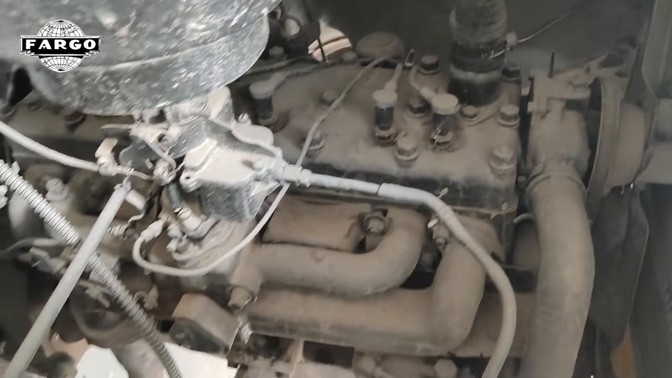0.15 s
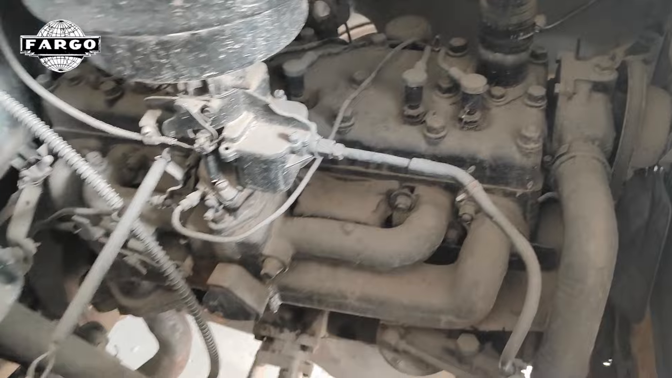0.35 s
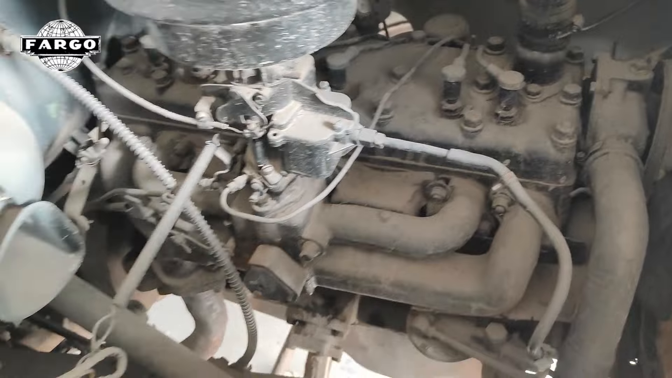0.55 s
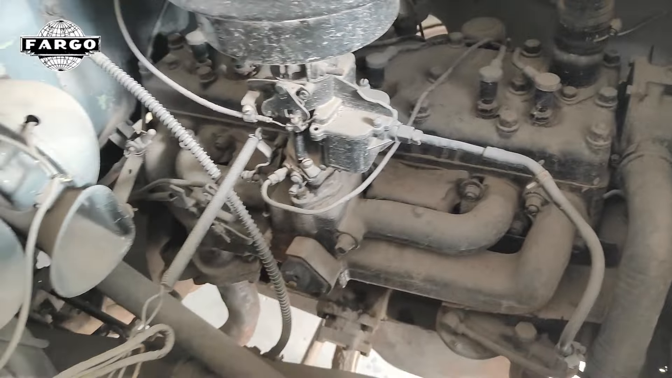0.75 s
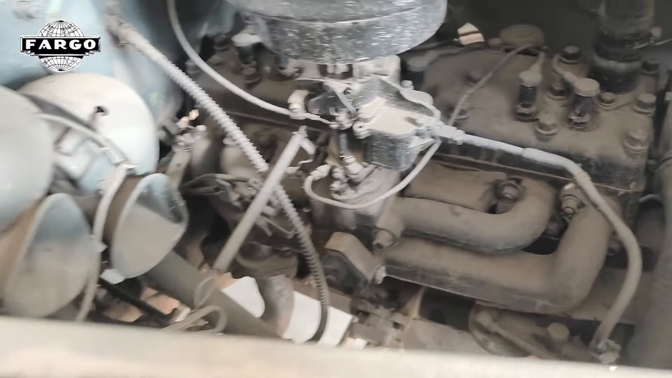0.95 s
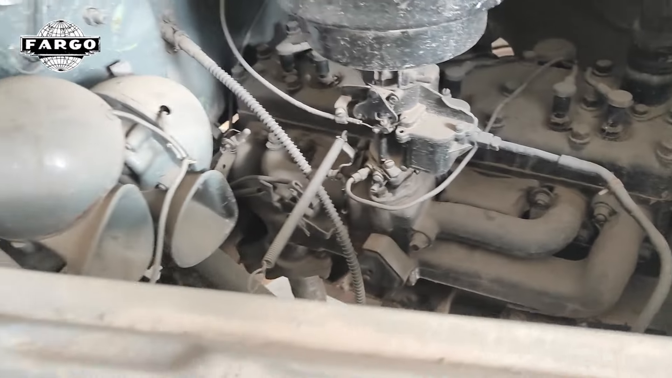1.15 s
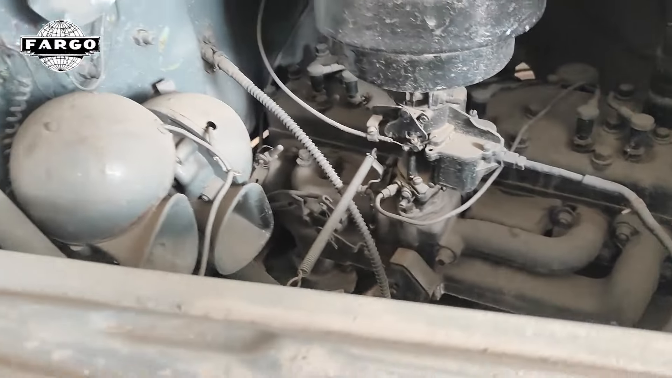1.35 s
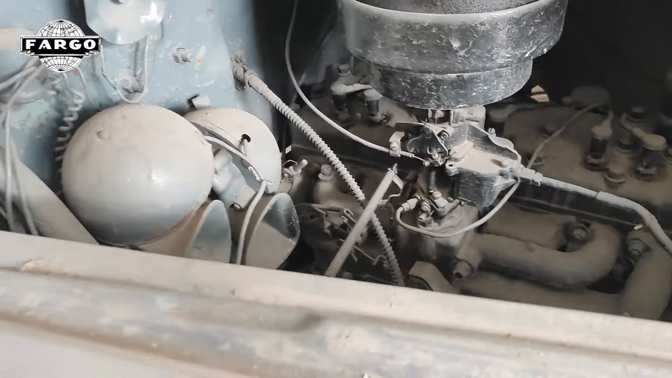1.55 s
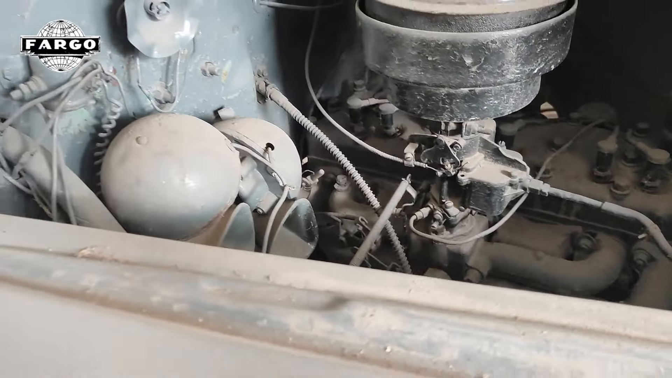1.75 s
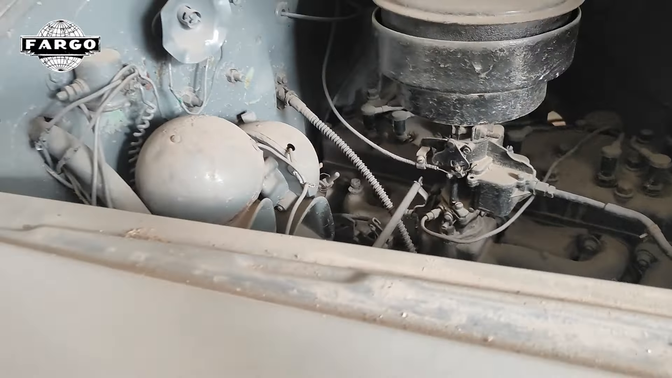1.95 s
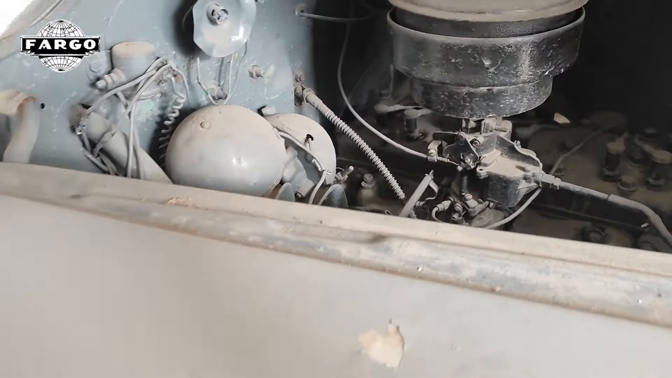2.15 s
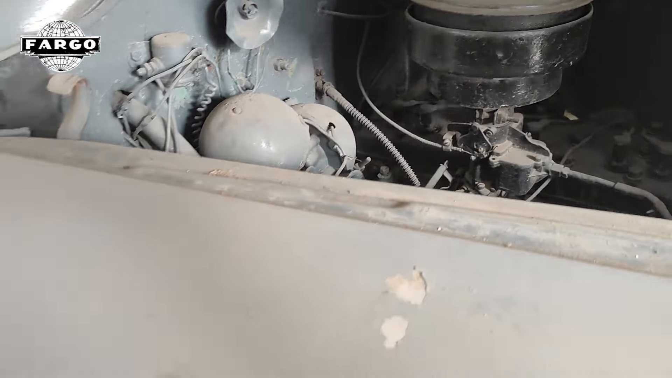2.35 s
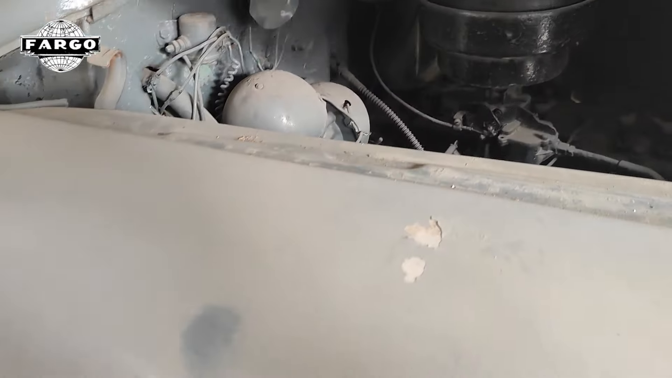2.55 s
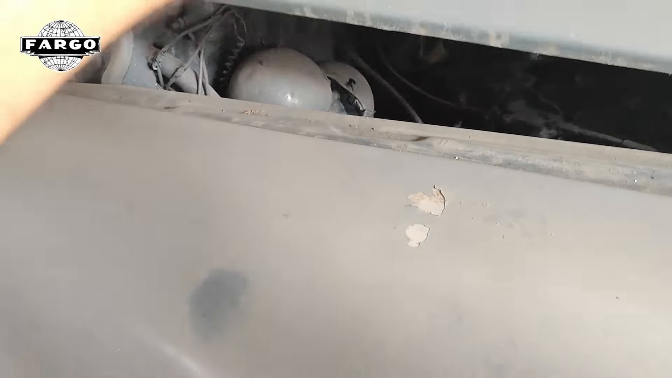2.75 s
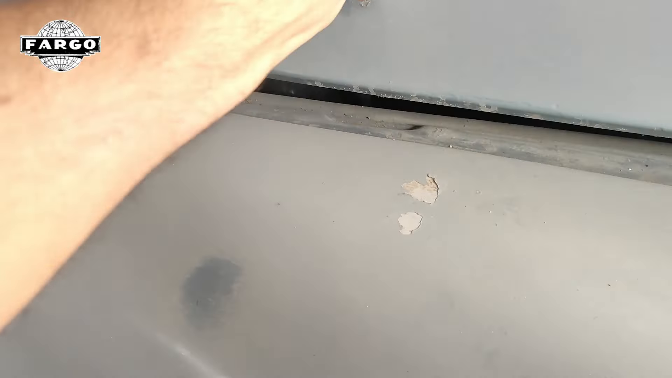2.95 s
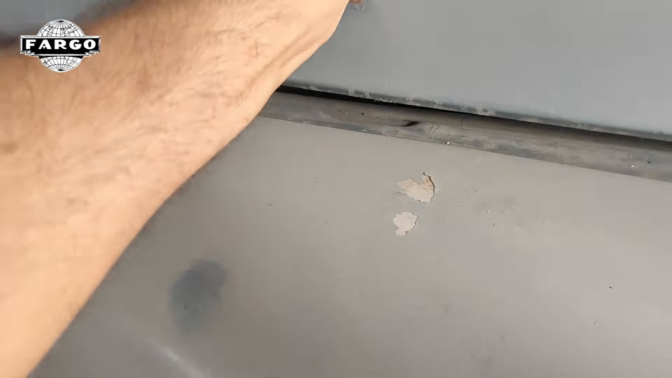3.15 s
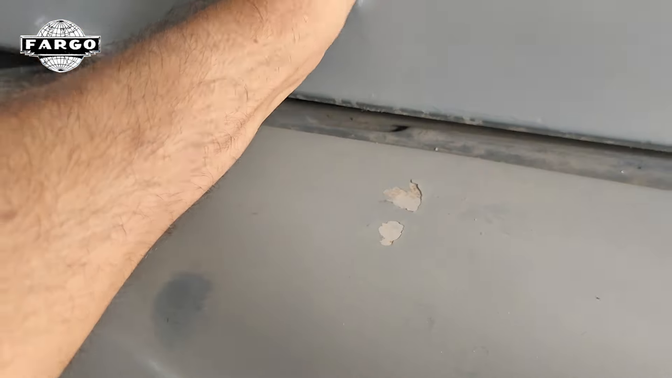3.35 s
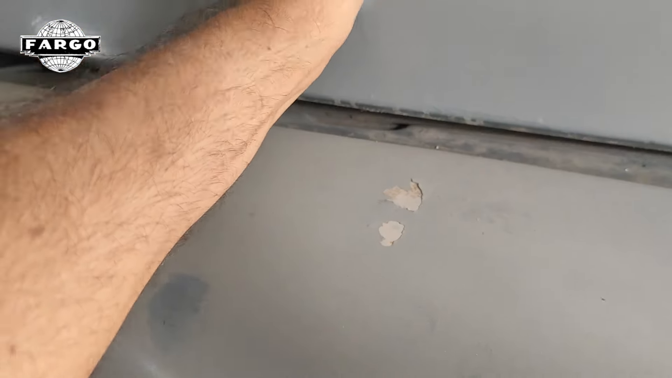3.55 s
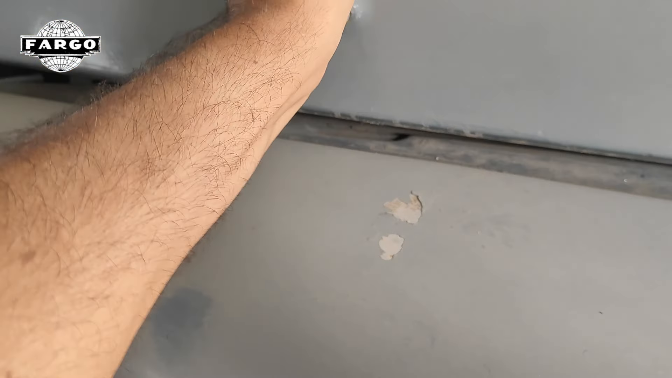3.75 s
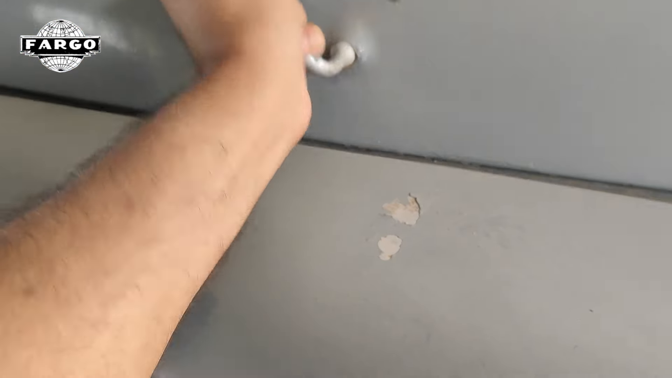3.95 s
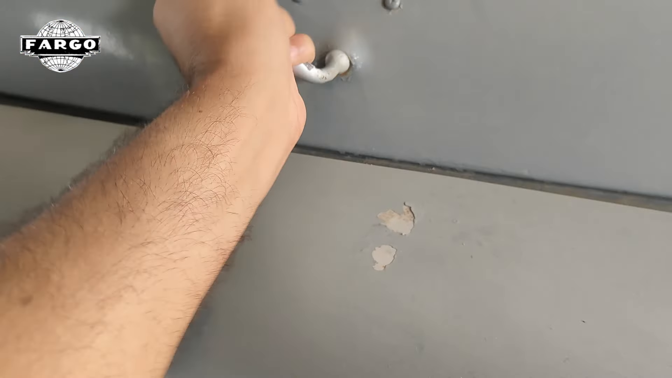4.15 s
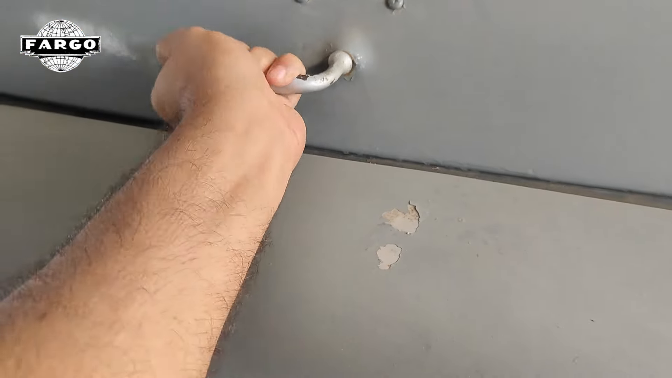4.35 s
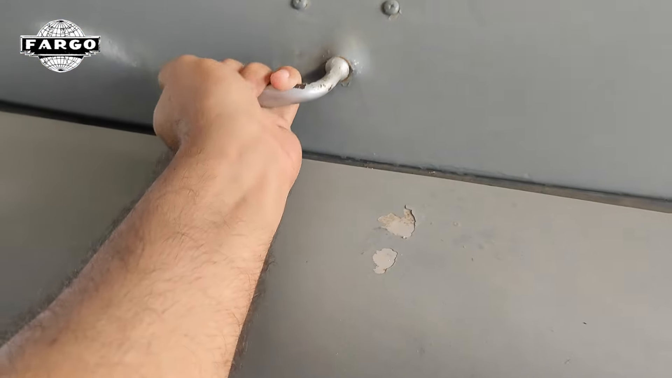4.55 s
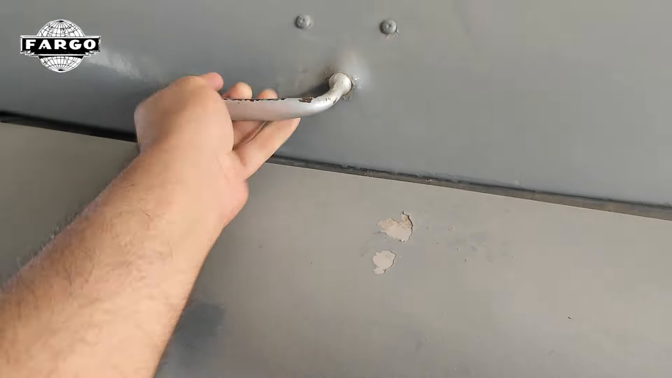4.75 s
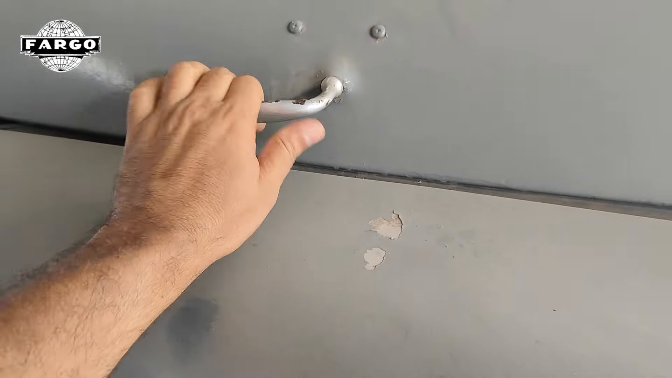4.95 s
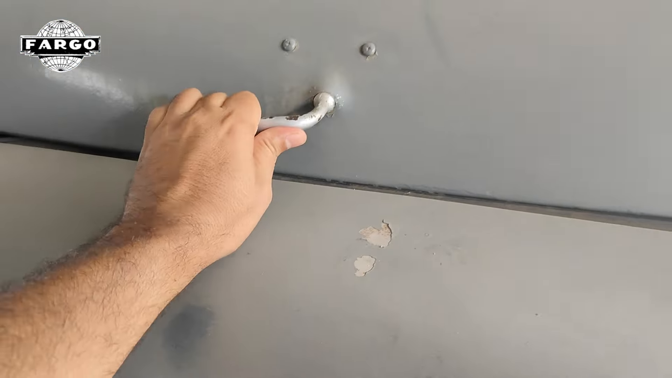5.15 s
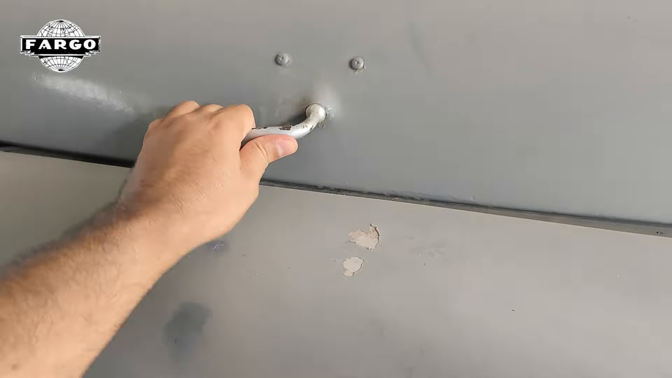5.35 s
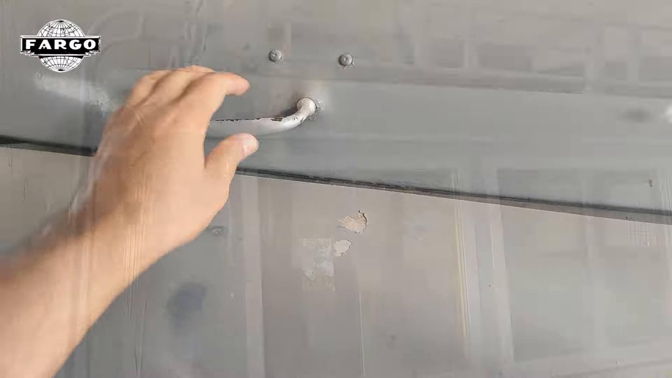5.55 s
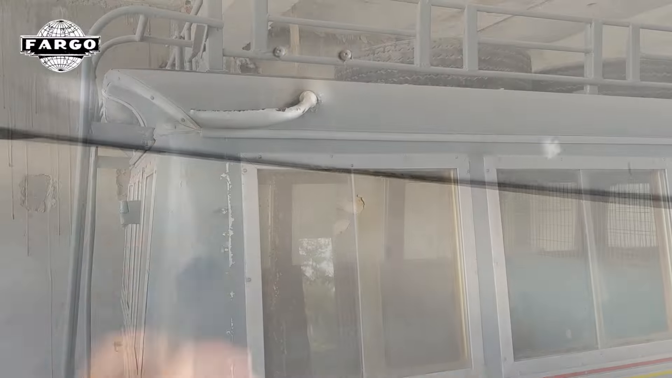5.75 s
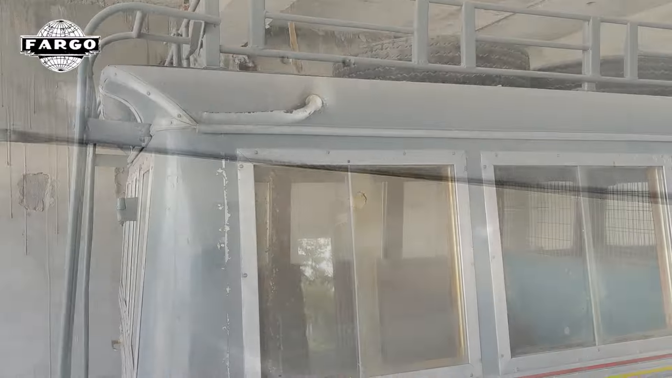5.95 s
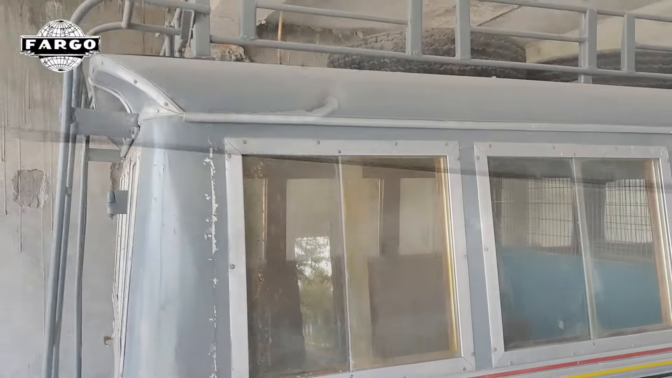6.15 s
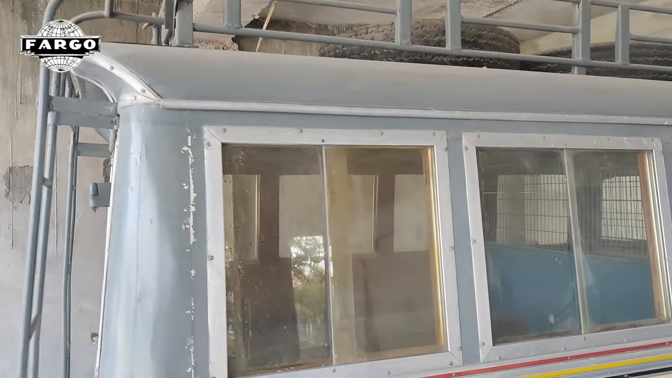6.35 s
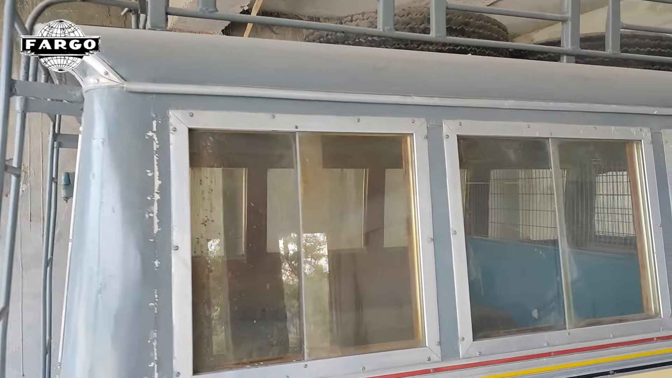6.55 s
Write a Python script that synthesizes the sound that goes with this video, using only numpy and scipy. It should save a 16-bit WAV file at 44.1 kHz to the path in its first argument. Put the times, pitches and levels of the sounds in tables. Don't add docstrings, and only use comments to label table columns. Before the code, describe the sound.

A close stereo pickup beside an old bus: low engine rumble and soft road hiss, tiny metallic pings, a piercing brake squeal from passing traffic. Loose sheet metal grates briefly and falls in a rattling double clank. About a second later it is slammed home, loud and deep with a short rattle. Quiet knocks of a turned handle under a far reedy horn, then traffic swells with a rhythmically chirping engine.

```python
import sys
import numpy as np
from scipy import signal
from scipy.fft import rfft, irfft, next_fast_len
from scipy.io import wavfile

SR = 44100
rng = np.random.default_rng(int(sys.argv[2]) if len(sys.argv) > 2 else 0)


def to_wav(sig):
    pcm = np.clip(np.atleast_2d(sig), -1, 1) * 32767
    pcm = np.round(pcm).astype(np.int16)
    wavfile.write(sys.argv[1], SR, pcm.T)


def convert_level_to_amplitude(level_db):
    exponent = np.asarray(level_db, float) / 20
    return 10 ** exponent


N = 290616
TIME = np.arange(N) / SR
STREET_LAG_S = -.00046


def rms_one(x):
    return x / np.sqrt(np.mean(x ** 2) + 1e-20)


def in_time(rows, times=TIME):
    s, *columns = np.transpose(rows)
    return [np.interp(times, s, c) for c in columns]


def at_hz(points, hz):
    table = np.array(points)
    return np.interp(np.log(hz), np.log(table[:, 0]), table[:, 1])


def drift(rate, size=N):
    r = np.exp(-40 * np.pi * rate / SR)
    slow = signal.lfilter([1], [1, -2 * r, r * r], rng.standard_normal(N // 20 + 4002))[4000:]
    return np.interp(np.arange(size) / 20, np.arange(len(slow)), rms_one(slow))


def ring(clicks, hz, t60):
    r = convert_level_to_amplitude(-60 / (max(t60, .004) * SR))
    w = 2 * np.pi * hz / SR
    return signal.lfilter([0, np.sin(w)], [1, -2 * r * np.cos(w), r * r], clicks + 1e-18)


def placed(x, pan_db, lag_s):
    left = np.interp(TIME - lag_s, TIME, x)
    return np.array([left * convert_level_to_amplitude(pan_db / 2), x * convert_level_to_amplitude(-pan_db / 2)])


def partial(rows, width_hz, steady=1.3):
    span = slice(round(rows[0][0] * SR), round(rows[-1][0] * SR))
    t, out = TIME[span], np.zeros(N)
    hz, level_db = in_time(rows, t)
    fade = np.minimum(np.minimum(t - t[0], t[-1] - t) / 0.0062, 1)
    turn = 2 * np.pi * np.cumsum(hz) / SR
    in_phase = (steady + drift(width_hz, size=len(t))) * np.cos(turn)
    quadrature = drift(width_hz, size=len(t)) * np.sin(turn)
    out[span] = fade * convert_level_to_amplitude(level_db) * rms_one(in_phase + quadrature)
    return out


def street():
    # frequency in Hz, level in dB per Hz.
    colour = [(13, -44), (22, -10.5), (111, -1.5), (183, -5), (254, -14), (363, -17.5), (1600, -26.5),
              (1940, -25), (3270, -30), (4550, -35.5), (7260, -37.5), (8330, -32), (9300, -44.5),
              (12900, -53), (15700, -70)]
    # frequency in Hz, share of power heard alike by both microphones.
    likeness = [(60, 1), (250, 1), (600, 0.14), (1500, 0.08), (15000, 1)]
    # time in seconds, hiss level in dB.
    traffic = [(0.0, -45), (1.14, -45.5), (2.43, -44), (3.38, -48), (3.9, -47.5), (4.5, -52.5),
               (5.12, -52.5), (5.62, -49.5), (6.18, -40), (6.59, -38.5)]
    hiss_db, = in_time(traffic)
    rumble_db = -31 + .8 * (hiss_db + 45)
    white, together = rng.standard_normal((2, 3, N + 100)), drift(8.7)
    lag = round(-STREET_LAG_S * SR)
    edges = 22 * 2 ** np.arange(0, 9.6, .5)
    out = np.zeros((2, 2, N))
    for k, (low, high) in enumerate(zip(edges, edges[1:])):
        band = signal.butter(2, [low, high], "band", fs=SR, output="sos")
        shared, *own = signal.sosfilt(band, white[k % 2])
        hz = np.sqrt(low * high)
        alike = np.clip(at_hz(likeness, hz), 0, 1)
        pair = np.sqrt(alike) * np.array([shared[lag:N + lag], shared[:N]])
        pair = pair + np.sqrt(1 - alike) * np.array(own)[:, :N]
        flicker_db = 0.81 * together + 0.65 * drift(9.5)
        out[int(hz > 400)] += convert_level_to_amplitude(at_hz(colour, hz) + flicker_db) * pair
    return convert_level_to_amplitude(rumble_db) * rms_one(out[0]) + convert_level_to_amplitude(hiss_db + 7.0) * rms_one(out[1])


def engines():
    # time in seconds, firing rate in Hz.
    idle = [(0.0, 63.7), (0.6, 63.72), (1.2, 67), (1.65, 64), (2.0, 71.12), (2.6, 71.05)]
    # crest time in seconds, order (multiple of the firing rate), crest in dB, half width in seconds.
    surges = [(0.028, 1, -34, 0.12), (1.1, 1, -36.5, 0.38), (1.82, 1.03, -35, 0.084),
              (2.04, 1.07, -32, 0.13), (2.58, .96, -33.5, 0.23), (0.02, 2, -32.5, 0.29),
              (0.62, 1.9, -29, 0.17), (1.38, 2, -36, 0.4), (2.06, 2, -28.5, 0.16), (2.5, 2.04, -39.5, .2),
              (0.083, 2.96, -33.5, 0.081), (0.38, 3.02, -30, 0.049), (0.65, 3.04, -35, 0.43),
              (0.94, 5.2, -41, 0.17), (2.28, 4.98, -44.5, 0.22), (1.77, 5.4, -44.5, 0.38),
              (1.41, 3.0, -38, 0.32), (0.55, 4.55, -45.5, 0.3)]
    # time in seconds, pitch in Hz, level in dB.
    arrival = [(5.4, 92, -56), (5.68, 93, -43), (6.43, 101.7, -32), (6.5, 107, -52), (6.59, 112, -31)]
    turn = 2 * np.pi * np.cumsum(in_time(idle)[0] * (1 + 0.0111 * drift(4.06))) / SR
    orders = np.zeros(N)
    for s, order, crest_db, half_s in surges:
        wave = np.cos(order * turn + rng.uniform(0, 2 * np.pi))
        orders += convert_level_to_amplitude(crest_db + 4.5) * wave / (1 + ((TIME - s) / half_s) ** 2)
    idling = orders * np.clip((3.0 - TIME) / .3, 0, 1)
    return placed((idling + partial(arrival, 5.3)) * convert_level_to_amplitude(-2.0), 0.14, STREET_LAG_S)


def pings(events, echo_db, pan_db):
    out, after = np.zeros(N + SR), TIME[:SR // 2]
    for s, peak_db, hz, t60 in events:
        scatter = rng.standard_normal(len(after)) * convert_level_to_amplitude(echo_db - 60 * after / (2.4 * t60))
        scatter[:60] += np.hanning(60) * np.cos(2 * np.pi * hz * after[:60]) / 15
        out[round(s * SR):][:len(after)] += convert_level_to_amplitude(peak_db) * ring(scatter, hz, t60 / 4.1)
    return placed(out[:N], pan_db, STREET_LAG_S)


def clinks():
    # start in seconds, peak in dB, pitch in Hz.
    parts = [
        (0.3676, -33.5, 3720),
        (0.865, -36, 4280),
        (1.541, -38.5, 4300),
        (1.6536, -35.5, 4160),
        (1.809, -29.5, 4270),
        (3.3847, -46, 4290),
        (5.5847, -47, 4740),
    ]
    return pings([(s, db, hz, 0.096) for s, db, hz in parts], -25.5, -1.5)


def ticks():
    # start in seconds, peak in dB.
    taps = [
        (0.829, -40),
        (1.1019, -27.5),
        (1.2018, -45),
        (1.295, -47),
        (1.3908, -32),
        (1.4182, -45),
        (1.4913, -43),
        (1.6985, -32),
        (1.8093, -36),
    ]
    return pings([(s, db, 12735, 0.2) for s, db in taps], -37, -0.075)


def swell(start, length, pitch_hz, glide_hz, crest_db, even=0):
    seize_s = 0.0069
    since = np.array([0, seize_s, 0.37 * length, length - seize_s, length])
    shape_db = np.array([-20, -10 * (1 - even), 0, -9 * (1 - even), -20])
    return np.transpose([start + since, pitch_hz + glide_hz * since / length, crest_db + shape_db])


def brakes():
    # time in seconds, pitch in Hz, level in dB.
    main_squeal = [(1.4, 8240, -40), (1.8, 8080, -38.5), (2.16, 8400, -35), (2.55, 8500, -38.5),
                   (2.68, 8200, -30), (2.88, 8160, -65)]
    # start and length in seconds, pitch and glide in Hz, crest in dB.
    other_squeals = [
        (1.215, 0.74, 8420, 150, -33.5),
        (2.045, 0.61, 9580, -130, -37.5),
        (2.1, .5, 8960, 40, -55),
    ]
    thin_squeaks = [
        (1.08, .16, 3500, 5, -54),
        (1.24, .66, 6780, -40, -54),
        (1.32, .17, 3505, 5, -50),
        (2.18, .29, 4813, -25, -54),
        (4.68, .45, 9150, 0, -75),
        (4.68, .45, 9550, 0, -74),
        (4.66, .45, 9950, 0, -75),
    ]
    pad_hiss = [
        (1.245, 1.4, 5730, 50, -49.5),
        (1.3, 1.347, 10740, 302, -58.5),
    ]
    modes = [main_squeal] + [swell(*row) for row in other_squeals]
    squeal = sum(partial(rows, 48, steady=0.79) for rows in modes)
    halo = [sum(partial(rows, 195, steady=0) for rows in modes[:3]) for side in range(2)]
    squeaks = sum(partial(swell(*row, even=.8), 16, steady=1.5) for row in thin_squeaks)
    squeaks = squeaks + sum(partial(swell(*row), 540, steady=0) for row in pad_hiss)
    lines = placed(squeal, -2.3, STREET_LAG_S) + placed(squeaks * convert_level_to_amplitude(3.0), .1, STREET_LAG_S)
    return lines + convert_level_to_amplitude(-7.5) * np.array(halo)


def boom():
    # start in seconds, level in dB, pitch in Hz, t60 in seconds.
    cavity = [
        (4.108, -9, 108, 0.45),
        (4.1, -8.5, 144, .3),
        (3.3, -24, 63, 0.34),
        (1.4, -26, 66, 0.69),
    ]
    out = np.zeros(N)
    for s, level_db, hz, t60 in cavity:
        after = np.maximum(TIME - s, 0)
        envelope = convert_level_to_amplitude(level_db - 60 * after / t60) * (1 - np.exp(-after * hz))
        out += envelope * np.sin(2 * np.pi * hz * after)
    return out


def sheet(low_hz, high_hz):
    # frequency in Hz, level in dB per Hz.
    colour = [(40, -11), (91, 0.5), (183, -9), (260, -6), (340, -3), (500, -10), (850, -11.5),
              (1200, -14.5), (1600, -21.5), (2450, -12.5), (2900, -19), (3600, -19.5), (5570, -32.5),
              (12300, -34), (15700, -54)]
    # frequency in Hz, t60 in seconds.
    damping = [(60, 0.3), (300, 0.12), (1500, 0.061), (5000, 0.071), (15000, 0.005)]
    t = TIME[:round(.8 * at_hz(damping, low_hz) * SR)]
    place = (np.arange(90) + rng.random(90))[:, None] / 90
    hz = low_hz / 1.25 * (1.55 * high_hz / low_hz) ** place
    overlap = np.minimum(np.minimum(place, 1 - place) * 5.44, 1) ** .5
    t60 = at_hz(damping, hz)
    size = overlap * convert_level_to_amplitude(at_hz(colour, hz) + rng.normal(0, 2.07, hz.shape)) * np.sqrt(hz / t60)
    decay = size * np.exp(-np.log(1000) * t / t60) * np.minimum(t * hz, 1)
    phase, lag = rng.uniform(0, 2 * np.pi, hz.shape), rng.normal(0, .00011, hz.shape)
    body = [np.sum(decay * np.sin(2 * np.pi * hz * (t - sign * lag) + phase), axis=0) for sign in (1, -1)]
    body = np.array(body)
    return body / np.sqrt(np.sum(body ** 2) / 2)


def shaking(events, boom_db, clang_db, sizzle_db, t):
    bright_share = np.array([-0.4, -0.011, 1.61, 1.88])[:, None]
    fall_share = np.array([.7, 1, 1.35, 2.5])[:, None]
    register_db = np.array([boom_db, 0, clang_db, sizzle_db])[:, None]
    power = 0
    for s, level_db, bright_db, hold_s, fall in events:
        db = level_db + register_db + bright_db * bright_share
        db = db - fall * fall_share * np.maximum(t - s - hold_s, 0)
        attack = np.clip((t - s) / .003, 0, 1)
        power = power + (attack * convert_level_to_amplitude(db)) ** 2
    return np.sqrt(power)


def panel():
    registers_hz = [50, 220, 1600, 5000, 15500]
    # start in s, shaking and brightness in dB, hold in s, fall in dB per s.
    rubs = [
        (2.588, -21, -1.5, 0.071, 150),
        (2.655, -18, 0.5, 0.058, 100),
        (2.72, -17.5, -2, .06, 75),
        (3.48, -38.5, -5, 0.04, 110),
    ]
    taps = [
        (3.932, -24, -3, .006, 190),
        (4.008, -22, -5, 0.0079, 300),
        (4.92, -38.5, -1, .005, 160),
        (4.993, -37.5, -4.5, 0.045, 86.5),
        (5.198, -37.5, -3.5, 0.016, 100),
    ]
    drops = [
        (2.894, -25, 8, .015, 200),
        (2.915, -15.5, 6, 0.016, 250),
        (2.952, -11, -0.5, 0.029, 91),
        (3.046, -14.5, -1, 0.015, 200),
        (3.075, -18, -5.5, 0.026, 103),
    ]
    slams = [
        (4.02, -17.5, 4, 0.028, 200),
        (4.06, -14.5, 0, .03, 200),
        (4.092, -15.5, 0.5, 0.014, 400),
        (4.115, -16.5, -1.5, 0.03, 96),
        (4.215, -31.5, -1, 0.012, 170),
        (4.27, -36, -5.5, 0.034, 69),
    ]
    # softest and sharpest force in Hz, then boom, clang and sizzle in dB over the drum register.
    kinds = [(rubs, (297, 7500, -5, -7.5, -16)), (taps, (150, 7000, 3, -5.5, -15)),
             (drops, (452, 12500, 2, -5, -13.5)), (slams, (91, 15995, 0, -1.5, -6))]
    start, end = round(2.5 * SR), round(5.7 * SR)
    size, out = end - start, np.zeros((2, N))
    pushes = []
    for events, (low_hz, cut_hz, *rule) in kinds:
        contact = signal.butter(1, [low_hz, min(cut_hz, .45 * SR)], "band", fs=SR)
        pushes.append((contact, shaking(events, *rule, TIME[start:end])))
    for spot in range(4):
        happens = rng.random(size) < 1300 / SR
        strength = convert_level_to_amplitude(2.76 * np.minimum(rng.exponential(1, size), 4))
        contacts = rms_one(happens * strength * rng.choice([-1, 1], size))
        force = sum(shape * signal.lfilter(*contact, contacts) for contact, shape in pushes)
        for low, high, push in zip(registers_hz, registers_hz[1:], force):
            sound = signal.oaconvolve(push[None] / 2, sheet(low, high), axes=1)
            out[:, start:start + sound.shape[1]] += sound
    return convert_level_to_amplitude([[1.2], [-1.2]]) * out


def blows(events, modes, share_db):
    out = np.zeros((2, N))
    start = round(events[0][0] * SR)
    for hz, level_db, t60 in modes:
        clicks = np.zeros((2, SR))
        for s, peak_db, centre_hz in events:
            chance_db = rng.normal(0, 1.2)
            off_pitch_db = 8.2 * np.log2(hz / centre_hz) ** 2
            at = round(s * SR) - start + rng.integers(0, 12, 2)
            clicks[[0, 1], at] = convert_level_to_amplitude(peak_db + level_db + share_db + chance_db - off_pitch_db)
        out[:, start:start + SR] += ring(clicks, hz, t60)
    return out


def frame_drop():
    # start in seconds, peak in dB, strongest contact pitch in Hz.
    falls = [
        (2.591, -23, 2300),
        (2.658, -15, 2300),
        (2.725, -23, 2290),
        (2.954, 3, 2280),
    ]
    catch = [
        (2.899, -1, 2530),
    ]
    settle = [
        (2.908, -4.5, 900),
        (3.075, -5, 900),
    ]
    rebound = [
        (3.0475, -10, 8000),
    ]
    # pitch in Hz, level in dB, t60 in seconds.
    sheet_modes = [(588, -16, 0.055), (856, 9.5, 0.1), (964, 11.5, 0.08), (1440, 6, .07), (2220, -5, 0.069),
                   (2570, 3.5, 0.098), (2950, 0, 0.065), (3680, -6, .05), (4430, -6, 0.028), (6450, 2, .04),
                   (7100, 3.5, 0.048), (7850, -5, 0.024), (8900, 1, 0.033), (10500, -5, .02)]
    bar_modes = [(1474, 3, 0.096), (2180, -1, 0.081), (2950, -3, 0.064), (3645, 4.5, 0.061),
                 (4150, -9, 0.073)]
    struck = blows(catch, bar_modes, -6) + blows(falls, sheet_modes, -14.0)
    return struck + blows(rebound, sheet_modes, -12.0) + blows(settle, sheet_modes, -17)


def slam():
    # start in seconds, peak in dB, strongest contact pitch in Hz.
    hits = [
        (3.933, -26, 2750),
        (4.028, -9, 2800),
        (4.046, 7.5, 2840),
        (4.104, 3, 2800),
    ]
    # pitch in Hz, level in dB, t60 in seconds.
    modes = [(1000, -11, .06), (1480, 0.5, 0.027), (2630, -11, 0.13), (2890, -12, 0.11), (3600, -3.5, .05),
             (4220, -2.5, 0.042), (6440, 1, 0.034), (7450, -7, .03), (9600, 17, .02)]
    return blows(hits, modes, -10)


def horn():
    # time in seconds, level of the upper reed in dB.
    breath = [(4.65, -53), (4.7, -41), (4.87, -45), (4.9, -52), (4.98, -46.5), (5.56, -48.5), (5.63, -55),
              (5.71, -47.5), (6.03, -50)]
    upper = [(s, 3444, db) for s, db in breath]
    lower = [(s, 3026, -57.5 + 0.2 * (db - breath[1][1] + 6)) for s, db in breath]
    reeds = sum(partial(rows, 40, steady=2.2) for rows in (upper, lower))
    return placed(reeds, .1, -0.00037)


def handle():
    # start in seconds, peak in dB, strongest contact pitch in Hz.
    knocks = [
        (4.924, -29, 800),
        (4.995, -29, 800),
        (5.203, -33, 800),
    ]
    # pitch in Hz, level in dB, t60 in seconds.
    modes = [(332, 13.5, 0.08), (687, 0.5, 0.096), (800, -3, 0.11), (1006, 1, 0.064), (1175, -9, 0.077)]
    return blows(knocks, modes, -6.0)


def belt():
    first_s, turn_s, slip_s = 5.667, .1185, 0.053
    out, after = np.zeros(N + SR), TIME[:SR // 8]
    puff = np.exp(-((after - slip_s / 2) / (slip_s / 2)) ** 2)
    for turn, (late, detune) in enumerate(rng.standard_normal((8, 2))):
        since = turn * turn_s
        peak_db = -37 - 14 * np.exp(-since / 0.23)
        slip = rms_one(ring(rng.standard_normal(len(after)), 8250 + 70 * detune, 0.016))
        envelope = 0.33 + puff ** convert_level_to_amplitude(2.7 * detune)
        at = round((first_s + since + .005 * late) * SR)
        out[at:][:len(after)] += convert_level_to_amplitude(peak_db - 6) * envelope * slip
    return placed(out[:N], -2.2, STREET_LAG_S)


def rasp():
    # time in seconds, pitch in Hz, level in dB.
    approach = [(6.2, 4340, -66), (6.34, 4480, -45.5), (6.44, 4550, -43), (6.49, 4500, -54),
                (6.54, 4710, -42), (6.58, 4710, -45)]
    return placed(partial(approach, 330, steady=0), .1, STREET_LAG_S)


def scene():
    road = street() + engines() + clinks() + ticks() + brakes() + horn() + belt() + rasp()
    bonnet = boom() + panel() + frame_drop() + slam() + handle()
    return road + bonnet


def low_pass(x):
    return signal.sosfilt(signal.butter(12, 15830, fs=SR, output="sos"), x)


def record(dry):
    # frequency in Hz, left minus right in dB.
    port_tilt = [(900, -0.84), (2000, -4.5), (4200, -1.5), (6400, 8), (7400, 3), (8300, -9.5), (10000, -40),
                 (15000, 0)]
    size = next_fast_len(N)
    tilt_db = at_hz(port_tilt, np.maximum(np.fft.rfftfreq(size, 1 / SR), 1))
    evened = np.sqrt(2 / (convert_level_to_amplitude(tilt_db) + convert_level_to_amplitude(-tilt_db)))
    ports = irfft(rfft(dry, size) * evened * convert_level_to_amplitude([tilt_db / 2, -tilt_db / 2]), size)[:, :N]
    return low_pass(1.29 * np.tanh(ports / 1.291))


dry = scene()
out = record(dry)
to_wav(out)
```